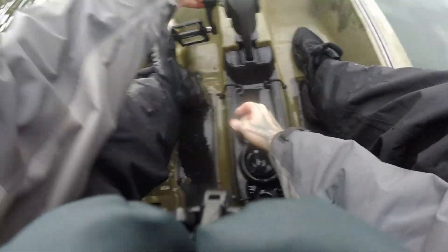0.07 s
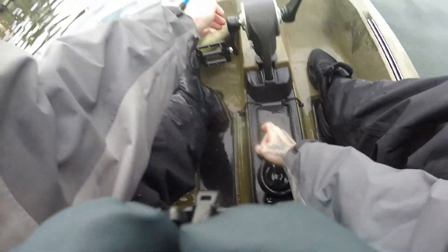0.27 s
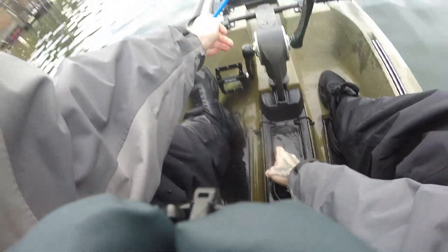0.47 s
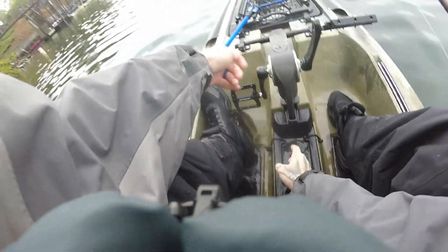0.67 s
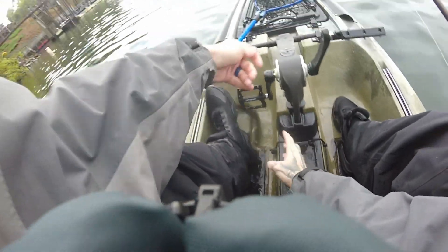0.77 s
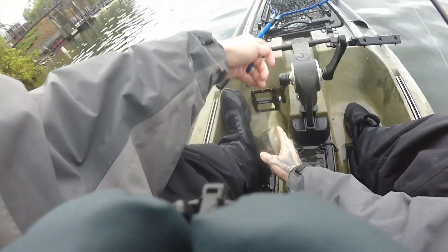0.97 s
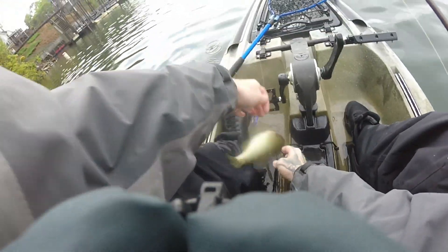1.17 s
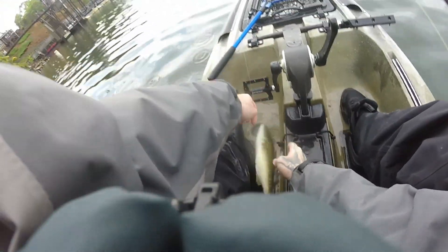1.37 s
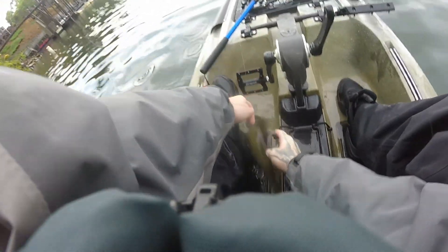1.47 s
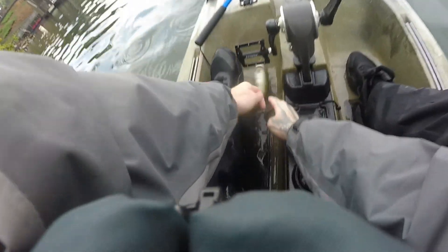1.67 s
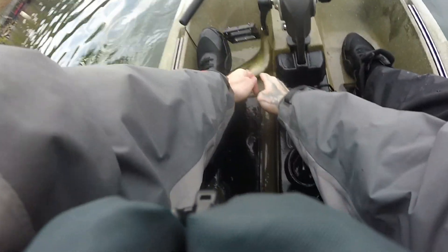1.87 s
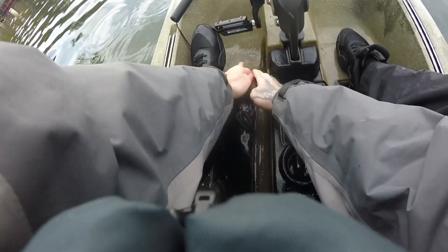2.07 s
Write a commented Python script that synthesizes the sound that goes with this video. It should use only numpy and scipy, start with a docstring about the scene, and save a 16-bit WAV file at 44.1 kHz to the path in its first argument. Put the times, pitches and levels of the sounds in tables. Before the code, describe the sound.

Hollow knocks on a plastic kayak hull with wet slaps as hands grab a flapping fish

```python
"""A jacket sleeve zips past and heavy knocks start: a small wet fish flaps in a plastic kayak as hands grab for it.
Each blow swings a panel, a decaying oscillator, and excites the damped modes of the hollow hull.
Wet slaps are short noise bursts ringing the spot they hit; rubs are scraping noise with a gliding resonance.
The sleeve is a rough whistle over hiss; cloth rustle and boat rumble are coloured noise under slow level curves.
The listening point is on the chest."""
import sys
import numpy as np
from scipy import signal
from scipy.fft import rfft, irfft
from scipy.io import wavfile

SR = 44100
rng = np.random.default_rng(int(sys.argv[2]) if len(sys.argv) > 2 else 0)


def wav_record(signal):
    """Record a signal, one row per channel, as 16-bit PCM in the file named by sys.argv[1]."""
    frames = np.transpose(np.atleast_2d(signal))
    bounded = np.clip(frames, -1, 1)
    # unit amplitude maps onto the largest positive 16-bit level
    quanta = np.round(bounded * 32767).astype(np.int16)
    wavfile.write(sys.argv[1], SR, quanta)


N = 94065
T = np.arange(N) / SR

# blows on the hull: (time [s], settled panel pitch [Hz], level [dB], panel swing time constant [s])
HULL_BLOWS = [(0.0432, 136, -12.5, 0.0039), (0.0708, 160, -1, 0.0024), (0.0954, 149, -20.5, 0.005),
              (0.1161, 175, -12.5, 0.0021), (0.2305, 180, -21, 0.0014), (0.251, 157, -22, 0.0059),
              (.286, 135, -28.5, 0.0055), (0.3168, 522, -28, 0.0021), (0.3497, 210, -20.5, 0.0027),
              (0.595, 347, -29.5, 0.0021), (0.716, 172, -19, 0.0041), (0.739, 203, -22.5, 0.0054),
              (.779, 204, -15, 0.0028), (1.079, 208, -31, 0.0064), (1.097, 437, -30, 0.0022),
              (1.177, 185, -34.5, 0.0056), (1.2808, 213, -21, 0.0021), (1.355, 330, -29, 0.0044),
              (1.492, 187.6, -24, 0.0094), (1.566, 173, -23.5, 0.0051), (1.586, 319, -26, 0.0061),
              (1.618, 402, -27, 0.0045), (1.625, 347, -20, 0.0039), (1.646, 144, -31.5, 0.0055),
              (1.797, 471, -26, 0.0045), (1.806, 134, -22.5, 0.0031), (1.854, 218, -15.5, 0.0044),
              (1.9191, 193, -22, 0.0061), (1.940, 428, -29.5, 0.007), (1.9649, 199, -20, 0.0038),
              (2.013, 176, -24.5, .007), (2.0415, 186, -13, 0.0025), (2.058, 156, -26.5, 0.0047)]
# modes of the hollow hull: (frequency [Hz], level [dB])
HULL_MODES = [(124, 5), (172, 5.5), (205, 3), (237, -5), (278, -1), (340, -1), (482, -4), (700, -10.5)]
# wet slaps and ticks: (time of peak [s], level [dB], decay time constant [s],
# tilt above 600 Hz [dB per octave], ring of the touched spot [Hz])
WET_SLAPS = [(0.038, -19.5, 0.0033, 3.5, 1760), (0.068, -19, 0.0021, 0, 2750),
             (0.0721, -17.5, 0.0042, 2, 4420), (0.094, -32, 0.0012, 1, 6000),
             (0.103, -25, 0.0022, 1.5, 2390), (.112, -16, 0.0042, -1.5, 2180),
             (0.133, -24.5, 0.0027, -1, 1020), (0.2219, -26.5, 0.0065, -3, 1510),
             (0.2329, -18, 0.0046, -1.5, 663), (0.254, -29.5, 0.0028, 2, 2400),
             (0.2876, -34.5, 0.0051, 3.5, 3330), (0.354, -30, 0.0033, -4, 1440),
             (0.397, -29.5, 0.0022, -1, 4130), (0.463, -44, 0.0041, 0, 2410),
             (0.506, -34, 0.0038, -0.5, 1610), (.647, -46.5, 0.0038, 9, 4900),
             (0.681, -30.5, 0.0026, -4, 900), (.708, -31, 0.013, 2, 2320), (0.717, -31, 0.014, -9, 2870),
             (.78, -26.5, 0.005, -1, 1600), (0.7916, -26, 0.0045, 2, 2600),
             (0.927, -39.5, 0.0067, -2, 2210), (1.053, -31.5, 0.0025, 2, 1670),
             (1.078, -37, 0.011, -2, 2260), (1.15, -39, .004, 11.5, 5900), (1.177, -33, 0.0038, 4, 3670),
             (1.194, -31.5, 0.00075, 11, 4000), (1.263, -34.5, 0.013, -1, 1710),
             (1.3544, -37, 0.0056, -3.5, 2140), (1.489, -32.5, 0.0036, -7, 2850),
             (1.5, -36.5, 0.008, 2, 4670), (1.565, -29.5, 0.0042, 1, 1720), (1.6195, -21, 0.0044, -3, 1045),
             (1.797, -37.5, 0.0055, 0, 1360), (1.845, -21.5, 0.0027, 1.5, 5220),
             (1.856, -19.5, 0.0048, -5, 1700), (1.9624, -22, 0.0022, 5, 1990),
             (2.017, -37.5, 0.0061, 1.5, 1840), (2.047, -30.5, 0.005, 3, 1290),
             (2.072, -38, 0.0083, -4.5, 1840), (2.094, -44.5, 0.019, 4, 2920)]
# spectrum of a contact with the deck: (frequency [Hz], level [dB])
DECK_COLOUR = [(100, 14), (400, 12.5), (800, 7), (1100, -1.5), (1600, 4), (2000, -2.5), (3600, -3.5),
               (6000, -7.5), (8500, -16), (11000, -29), (15000, -41.5)]
# wet skin and soles rubbing on plastic:
# (time [s], length [s], level [dB], resonance at the start [Hz], resonance at the end [Hz])
SKIN_RUBS = [(0.188, 0.024, -40.5, 434, 686), (0.256, 0.063, -44.5, 700, 713),
             (1.352, 0.072, -45, 896, 970), (1.872, 0.03, -34.5, 2757, 3360),
             (1.92, 0.0269, -41.5, 1106, 1700)]
# sleeve sliding over the jacket: (time [s], pitch of the zip [Hz], level [dB])
SLEEVE_SLIDE = [(0, 6300, -30.5), (.008, 3300, -40), (.02, 5200, -32.5), (.03, 5900, -24.5),
                (.042, 6500, -41), (.049, 9000, -30.5), (.057, 7400, -45), (.064, 5100, -33),
                (.069, 2900, -44)]
# spectrum of the sleeve's hiss: (frequency [Hz], level [dB])
SLEEVE_HISS_COLOUR = [(500, -29), (5500, 9), (9000, 12), (11000, -7), (15000, -15)]
# rustle of wet clothing: (time [s], level [dB])
RUSTLE_LEVEL = [(0, -33.5), (.12, -39), (.16, -44.5), (.3, -47.5), (.43, -49), (.62, -49), (.76, -45),
                (.98, -51.5), (1.04, -49), (1.45, -48.5), (1.8, -45.5), (1.9, -42), (2.13, -48.5)]
# spectrum of the rustle: (frequency [Hz], level [dB])
CLOTH_COLOUR = [(60, -55), (220, 16.5), (500, 11), (1000, 3.5), (3200, -2), (6000, -9.5), (9000, -19),
                (15000, -34)]
# low rumble of boat and body moving: (time [s], level [dB])
RUMBLE_LEVEL = [(0, -26), (.17, -21.5), (.33, -32.5), (.43, -39.5), (.9, -38), (1.03, -44.5), (1.45, -38.5),
                (1.65, -33.5), (1.78, -41), (1.95, -28), (2.13, -34)]
# spectrum of the rumble: (frequency [Hz], level [dB])
BOAT_COLOUR = [(22, 0.5), (45, -8.5), (70, -3.5), (115, -3.5), (200, -11.5), (400, -35.5), (1000, -84)]

PANEL_SAG, PANEL_SAG_S = 0.54, 0.0011  # a panel first rings sharp by this share, and settles
PANEL_CUT_HZ = 75  # a panel radiates little below this
# the crowded upper modes of a struck panel, centred at this multiple of its pitch
CLACK_DB, CLACK_RATIO, CLACK_Q, CLACK_DECAY_S = -15, 2.08, 0.85, 0.0093
HULL_RING_DB, HULL_BUILD_S = -15, 0.003
HULL_T60_S, HULL_T60_SLOPE = 0.23, -0.6  # of the lowest mode; shorter with rising pitch by this power
HULL_SCATTER_DB, HULL_DETUNE = 2, 0.025  # chance spread of each mode's level and pitch (share)
SLAP_LEAD_S, SLAP_RISE_SHARE = 0.03, 0.31  # the rise is this share of the decay
SLAP_GRAIN_DB, SLAP_GRAIN_S = 3.5, 0.0005
SPOT_RING_DB, SPOT_Q = 5.5, 9.5
SPOT_CUT_SHARE = 0.32  # a small spot radiates little below this share of its ring
COCKPIT_DB, COCKPIT_T60_S = -10, 0.041
RUB_Q, RUB_SQUEAK_DB = 6, -4
RUB_SLIP_DB, RUB_SLIP_S = 2, 0.00199
SLEEVE_ROUGH, SLEEVE_ROUGH_S = 0.116, 0.00015  # random share of the pitch
SLEEVE_FLUTTER_DB, SLEEVE_FLUTTER_S = 3.8, 0.0013
SLEEVE_HISS_DB = -5.5
RUSTLE_GRAINS_PER_S, RUSTLE_GRAIN_DB = 90, -7
RUSTLE_SWELL_DB, RUSTLE_SWELL_S = 1, 0.03  # the rubbing swells as the arms move
TOP_HZ = 15400


def undb(db):
    """Amplitude gain is ten to the power of decibels over twenty."""
    return 10 ** (np.asarray(db) / 20)


def unit(x):
    """Normalization: scale a signal to rms 1."""
    return x / np.sqrt(np.mean(x ** 2))


def curve(rows, axis=1):
    """Linear interpolation: one column of a table joined by straight lines in time."""
    rows = np.array(rows)
    return np.interp(T, rows[:, 0], rows[:, axis])


def colour(x, points, tilt_db=0):
    """Spectral shaping: weight by (Hz, dB) points and a tilt per octave above 600 Hz, at rms 1."""
    freqs = np.fft.rfftfreq(len(x), 1 / SR)
    octave = np.log2(np.maximum(freqs, 1))
    hz, db = np.array(points).T
    tilted = db + tilt_db * np.log2(np.maximum(hz, 600) / 1000)
    gain = undb(np.interp(octave, np.log2(hz), tilted))
    return unit(irfft(rfft(x) * gain, len(x)))


def wander(n, seconds):
    """Slow random modulation: normal draws this many seconds apart, joined by straight lines."""
    step = max(seconds, 1 / SR)
    return np.interp(np.arange(n) / SR / step, np.arange(n), rng.standard_normal(n))


def add(out, start, x):
    """Superposition: mix a sound in at its start time."""
    i = max(int(start * SR), 0)
    out[i:i + len(x)] += x[:max(N - i, 0)]


def knocks():
    """Impulsive excitation: a panel swings briefly with a hollow clack, and the damped hull modes ring on."""
    out, t = np.zeros(N), T[:SR // 2]
    hz, db = np.array(HULL_MODES).T[:, :, None]
    t60 = HULL_T60_S * (hz / hz[0]) ** HULL_T60_SLOPE
    fades = undb(db - 60 * t / t60) * (1 - np.exp(-t / HULL_BUILD_S))
    for start, pitch, level_db, decay in HULL_BLOWS:
        # phase of a pitch that sags to its settled value
        turns = pitch * (t + PANEL_SAG * PANEL_SAG_S * (1 - np.exp(-t / PANEL_SAG_S)))
        swing = (t / decay * np.exp(1 - t / decay)) ** 1.17
        panel = swing * np.sin(2 * np.pi * turns)

        mode_hz = hz * (1 + HULL_DETUNE * rng.standard_normal(hz.shape))
        modes = fades * np.sin(2 * np.pi * mode_hz * t)
        hull = undb(HULL_SCATTER_DB * rng.standard_normal(len(HULL_MODES))) @ modes

        band = signal.iirpeak(CLACK_RATIO * pitch, CLACK_Q, SR)
        once = signal.lfilter(*band, rng.standard_normal(len(t)))
        clack = unit(signal.lfilter(*band, once))
        clack = clack * np.minimum(t / decay, 1) * np.exp(-t / CLACK_DECAY_S)

        blow = panel + undb(CLACK_DB) * clack + undb(HULL_RING_DB) * hull
        add(out, start, undb(level_db) * blow)
    return signal.lfilter(*signal.butter(2, PANEL_CUT_HZ, "high", fs=SR), out)


def slaps():
    """Noise-excited resonance: each wet contact splatters, rings its spot and reverberates in the cockpit."""
    out, t = np.zeros(N), T[:8192]
    for peak, level_db, decay, tilt_db, ring_hz in WET_SLAPS:
        grain = undb(SLAP_GRAIN_DB * wander(len(t), SLAP_GRAIN_S))
        splatter = rng.standard_normal(len(t)) * grain
        ring = signal.lfilter(*signal.iirpeak(ring_hz, SPOT_Q, SR), splatter)
        splatter = splatter + undb(SPOT_RING_DB) * ring
        splatter = signal.lfilter(*signal.butter(2, SPOT_CUT_SHARE * ring_hz, "high", fs=SR), splatter)
        # exponential rise up to the peak, exponential fall after it
        shape = np.exp(np.minimum((t - SLAP_LEAD_S) / SLAP_RISE_SHARE, SLAP_LEAD_S - t) / decay)
        slap = shape * colour(splatter, DECK_COLOUR, tilt_db)
        add(out, peak - SLAP_LEAD_S, undb(level_db) * slap)
    echoes = rng.standard_normal(len(t)) * np.exp(-np.log(1000) * t / COCKPIT_T60_S)
    echoes = echoes / np.linalg.norm(echoes)
    return out + undb(COCKPIT_DB) * signal.fftconvolve(out, echoes)[:N]


def rubs():
    """Stick-slip friction: skin scrapes wet plastic with a squeaky resonance that glides as the grip shifts."""
    out = np.zeros(N)
    for start, length, level_db, from_hz, to_hz in SKIN_RUBS:
        n = int(length * SR)
        hz = np.linspace(from_hz, to_hz, n)
        turn = 2 * np.pi * np.cumsum(hz) / SR
        # two slow random weights make the squeak a narrow band of noise
        sway = [wander(n, RUB_Q / from_hz / 2) for _ in range(2)]
        squeak = unit(sway[0] * np.cos(turn) + sway[1] * np.sin(turn))
        high_pass = signal.butter(2, SPOT_CUT_SHARE * to_hz, "high", fs=SR)
        scrape = colour(signal.lfilter(*high_pass, rng.standard_normal(n)), DECK_COLOUR)
        slips = unit(undb(RUB_SLIP_DB * wander(n, RUB_SLIP_S)))
        rub = slips * (scrape + undb(RUB_SQUEAK_DB) * squeak)
        add(out, start, undb(level_db) * signal.windows.tukey(n) * rub)
    return out


def sleeve():
    """Periodic friction: ribbed cloth whistles roughly over hiss, at a pitch that follows the arm's speed."""
    hz = curve(SLEEVE_SLIDE) * (1 + SLEEVE_ROUGH * wander(N, SLEEVE_ROUGH_S))
    flutter = undb(SLEEVE_FLUTTER_DB * wander(N, SLEEVE_FLUTTER_S))
    zipping = np.sin(2 * np.pi * np.cumsum(hz) / SR) * flutter
    hiss = colour(rng.standard_normal(N), SLEEVE_HISS_COLOUR)
    level = undb(curve(SLEEVE_SLIDE, axis=2)) * (T < SLEEVE_SLIDE[-1][0])
    return (zipping + undb(SLEEVE_HISS_DB) * hiss) * level


def rustle():
    """Random friction: soft noise of rubbing cloth with sparse decaying grains, small crinkles and droplets."""
    grains = (rng.random(N) < RUSTLE_GRAINS_PER_S / SR) * rng.standard_normal(N)
    smear = rng.standard_normal(SR // 100) * np.exp(-T[:SR // 100] / 0.002)
    crinkle = unit(signal.fftconvolve(grains, smear)[:N])
    rubbing = rng.standard_normal(N) * undb(RUSTLE_SWELL_DB * wander(N, RUSTLE_SWELL_S))
    cloth = colour(rubbing + undb(RUSTLE_GRAIN_DB) * crinkle, CLOTH_COLOUR)
    return cloth * undb(curve(RUSTLE_LEVEL))


def rumble():
    """Low-frequency noise: boat and body shift under the listening point."""
    return colour(rng.standard_normal(N), BOAT_COLOUR) * undb(curve(RUMBLE_LEVEL))


def scene():
    """Superposition of all sources, within arm's reach of one microphone."""
    return (knocks() + slaps() + rubs() + sleeve() + rustle() + rumble())[None]


def record(dry):
    """Saturation and band limiting: round the loudest peaks, then cut the top of the spectrum."""
    rounded = dry / (1 + dry ** 4) ** 0.25
    low_pass = signal.ellip(8, 0.2, 70, TOP_HZ, fs=SR, output="sos")  # 0.2 dB ripple, 70 dB rejection
    return signal.sosfilt(low_pass, rounded)


dry = scene()
out = record(dry)
wav_record(out)
```